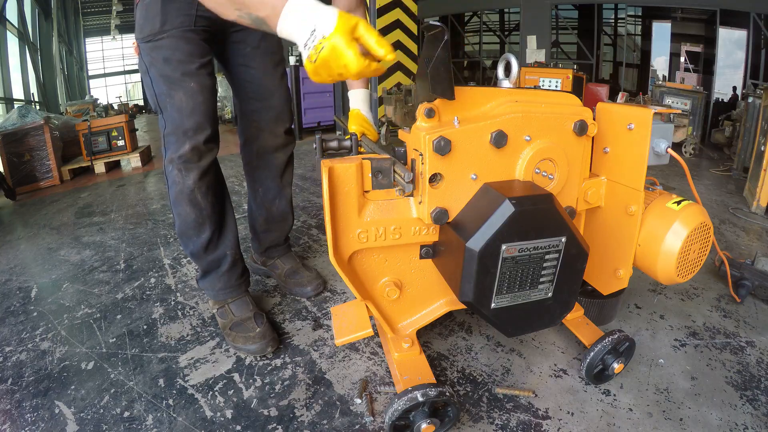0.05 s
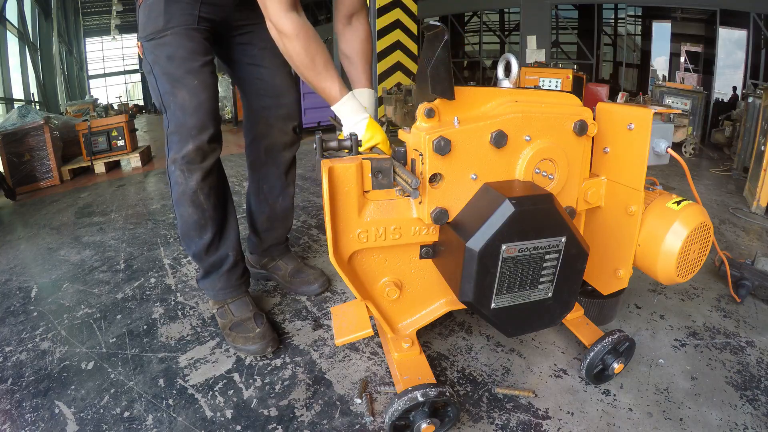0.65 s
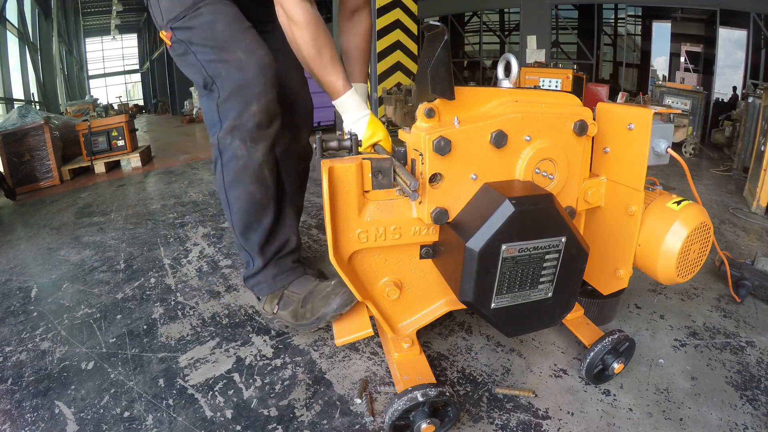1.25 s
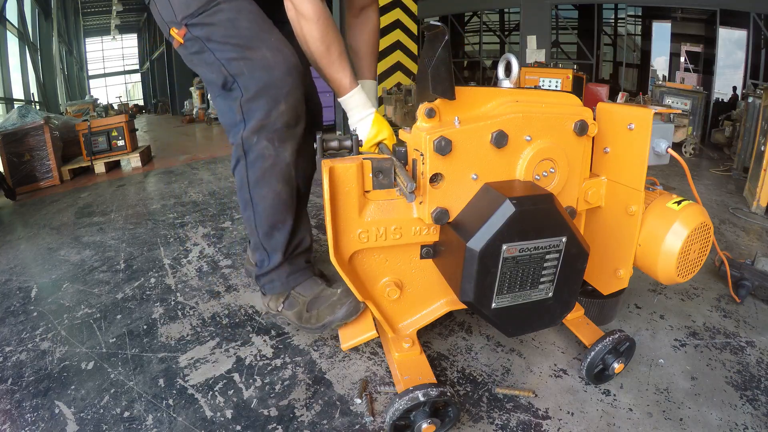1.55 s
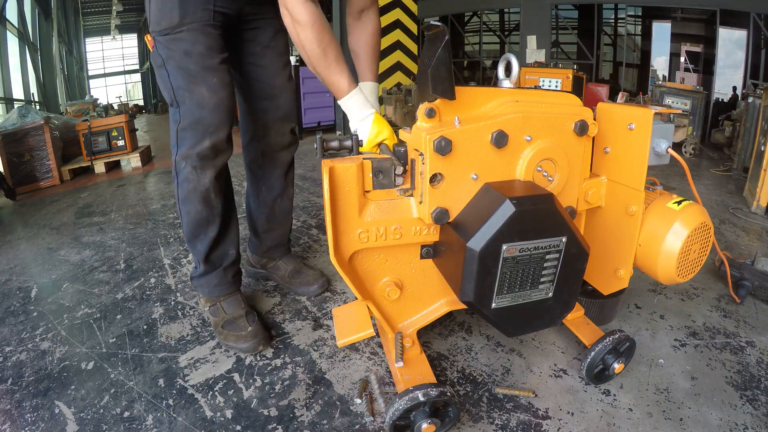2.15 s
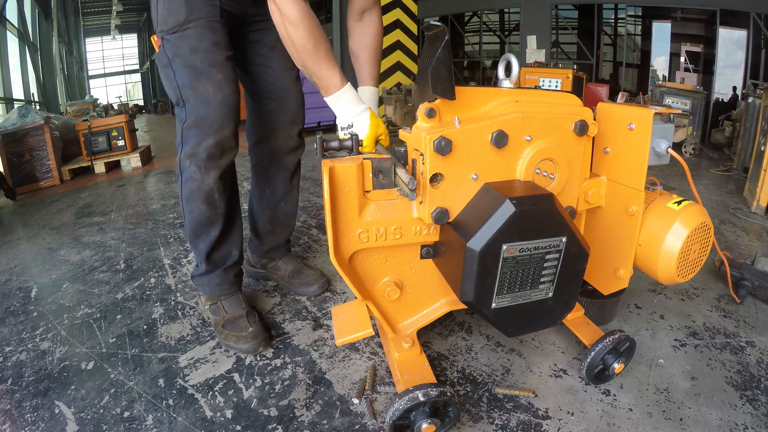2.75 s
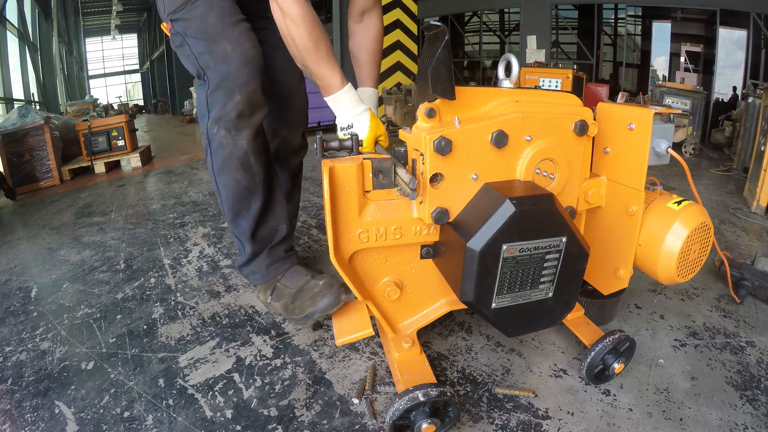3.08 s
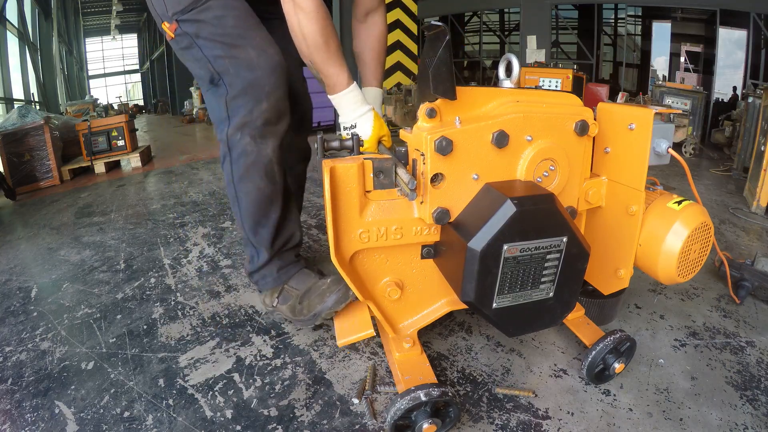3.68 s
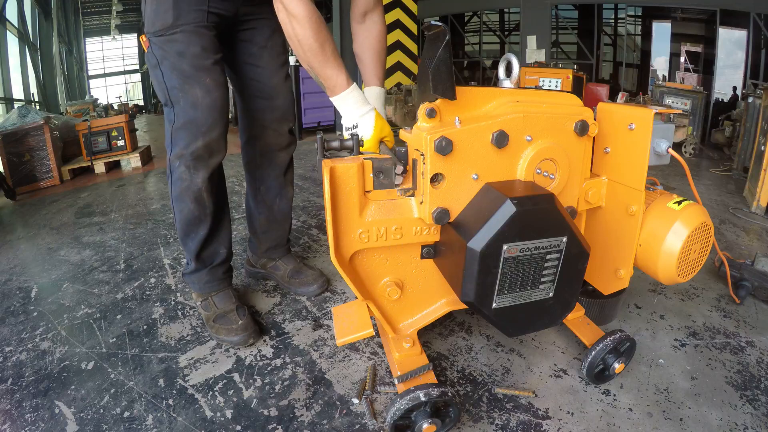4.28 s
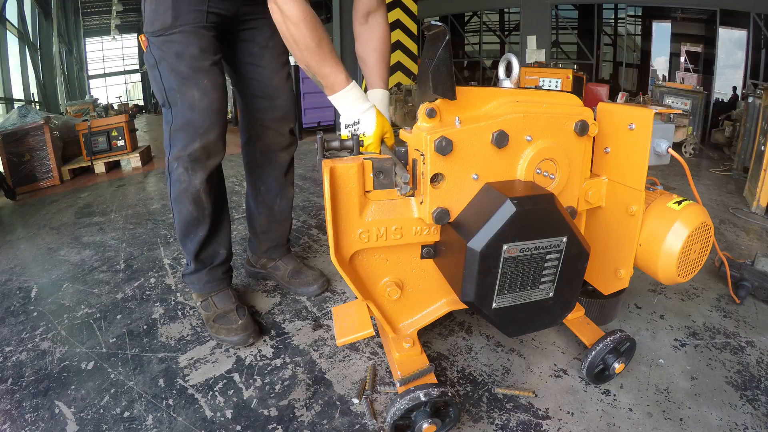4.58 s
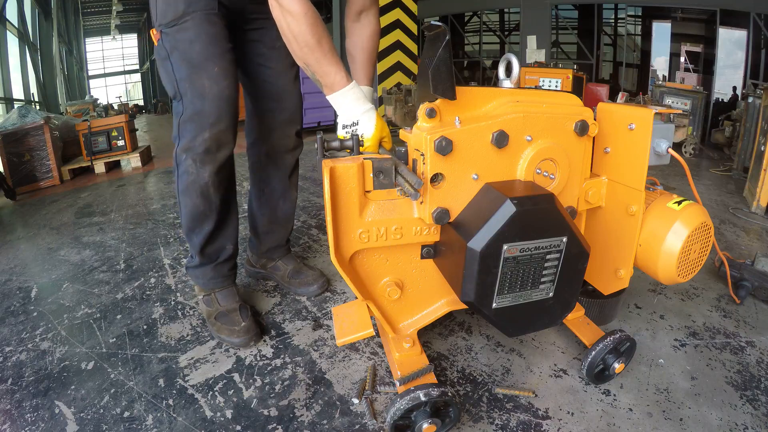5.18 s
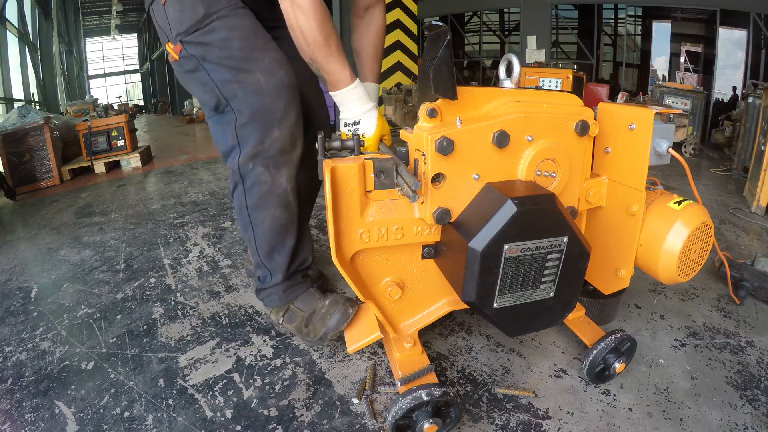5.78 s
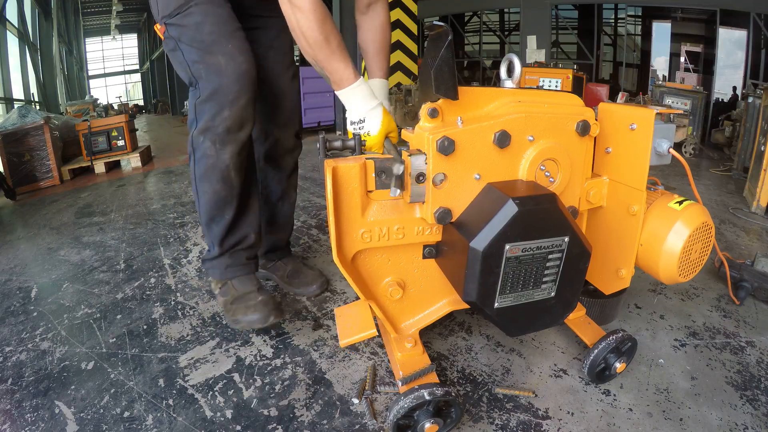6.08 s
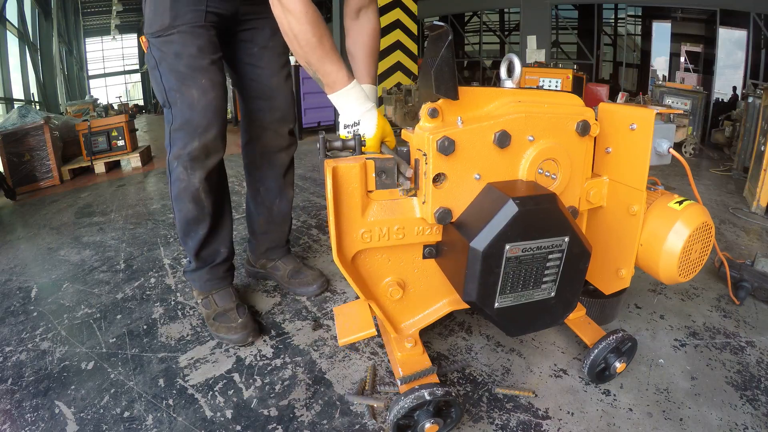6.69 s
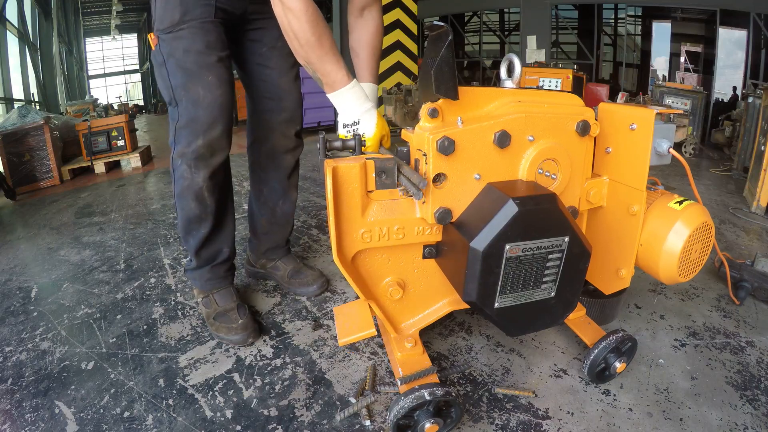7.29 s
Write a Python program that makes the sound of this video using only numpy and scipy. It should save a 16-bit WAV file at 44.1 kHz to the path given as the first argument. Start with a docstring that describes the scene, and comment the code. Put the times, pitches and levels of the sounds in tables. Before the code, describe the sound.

Close to a running steel shear, gear rattle and a buzzing motor drone fill a reverberant workshop. The machine makes three cuts, each a brief scrape followed by a cluster of heavy metal clunks and a crack. Moments later the cut bar ends hit the concrete, bouncing with bright clanks and a faint high ring. The machine noise sinks after every cut, then rises again and is still running at the end.

```python
"""In a concrete workshop hall, a motor-driven rebar shear cuts three times.
Gear teeth rattle in its cast housing over a hum; this steady sound dips at each stroke and swells back.
Stick-slip friction grates, the clutch slams in, and the frame groans and rings as the blade snaps the bars.
The offcuts clatter on the floor and ring thinly in their own modes.
The hall answers with diffuse reverberation and a low standing wave."""
import sys
import numpy as np
from scipy import signal
from scipy.fft import rfft, irfft, next_fast_len
from scipy.io import wavfile
from scipy.ndimage import uniform_filter1d, minimum_filter1d

SR = 44100
rng = np.random.default_rng(int(sys.argv[2]) if len(sys.argv) > 2 else 0)


def store_pcm(level_fs):
    """Save levels as 16-bit WAV."""
    pcm = np.round(np.clip(level_fs, -1, 1) * 32767).astype(np.int16)
    wavfile.write(sys.argv[1], SR, np.atleast_2d(pcm).T)


N = 332514
TIME = np.arange(N) / SR

# Levels in all tables are relative; a spectrum gives only the shape of a spectral density.
# blade strokes: (clutch time [s], bite time [s], return time [s], clutch rasp [dB], bar crunch [dB],
# return level [dB], dip of the steady sound [dB], hall boom [dB])
STROKES = [(1.484, 1.61, 1.892, -2, 2.5, 0.5, 6.5, -35), (3.578, 3.785, 3.989, 1, -3, -2, 8, -31.5),
           (5.806, 5.98, 6.202, 1, -3, -0.5, 7.8, -25.5)]
# clutch and blade blows; hard ones crack more and thud less:
# (time [s], strength [dB], hardness [dB], clink of the bars [dB])
BLOWS = [(1.5879, -12, 6, -18), (1.6283, -28, 5, -24), (1.659, -26.5, 8, -33), (1.7089, -18.5, -4.5, -19),
         (1.833, -22, -1, -17), (1.8765, -14, -6, -31), (1.892, -19.5, -8, -46), (3.7183, -20, 8.5, -15),
         (3.7381, -18.5, -5, -31), (3.761, -22.5, 9.5, -23.5), (3.8041, -16.5, 2.5, -16),
         (3.935, -20, -7, -33), (3.9771, -16.5, -4.5, -30), (3.9847, -15.5, -4, -29),
         (4.1582, -18.5, 0, -20), (5.802, -19.5, -1, -18.5), (5.9203, -13.5, 7.5, -20.5),
         (6.024, -17.5, 2.5, -17), (6.147, -23.5, 1, -26), (6.187, -21, 1, -37), (6.2, -17, -4, -34)]
# fractures of the steel: (time [s], level [dB])
FRACTURES = [(1.5868, -17), (3.719, -40), (3.975, -23), (5.921, -31)]
# offcut landings; heavy ones thud more and clank less:
# (time [s], strength [dB], weight [dB], hardness [dB])
LANDINGS = [(2.183, -27, -6, -5), (2.1945, -17.5, -10.5, 0.5), (2.2882, -17.5, -0.5, -3.5),
            (2.3064, -18.5, 2, 7.5), (2.316, -26, 6.5, 1), (2.605, -38.5, 15, 5), (4.2775, -19.5, -10, 4.5),
            (4.3879, -19, -0.5, 1), (4.4048, -20, 0, 6), (4.413, -25, 3, 0), (4.7859, -35, 1, 7.5),
            (6.4699, -23.5, -4, -3), (6.4776, -21, -13, 2), (6.5302, -22.5, -19.5, 0),
            (6.6009, -16.5, -2, 3.5), (6.6192, -23.5, 2.5, 7), (6.626, -24.5, 4.5, 5.5)]
# low, middle and high spectra of a steel impact: (frequency [Hz], level [dB])
THUD = [(50, -44), (110, -1), (170, -5), (250, 2.5), (350, -7.5), (550, -7.5), (900, -13), (2000, -56.5)]
CLANG = [(400, -2), (900, -2), (1400, 3.5), (2200, 1), (2800, -5.5), (3700, -10), (4500, -8), (6000, -47)]
CRACK = [(2500, -15.5), (4500, -7), (5500, 1.5), (6500, 1), (7200, -8), (8000, -17.5), (9100, -22.5),
         (10000, -27), (16000, -66)]
# spectrum of a bar chattering against the machine: (frequency [Hz], level [dB])
BAR_CLINK = [(2000, -30), (2850, -8), (3150, -1.5), (3400, -4), (3620, -3.5), (3750, 3.5), (3900, -5),
             (4200, -11), (5200, -32), (9000, -71)]


def blows(thud_db=-12.5):
    """Impact and fracture: as clutch and blade slam, the frame thuds, the housing clangs, steel parts."""
    # spectrum of parting steel: (frequency [Hz], level [dB])
    fracture_spectrum = [(6000, -14), (7600, 13), (9100, 2), (9700, -12), (15000, -24)]
    s, db, hardness, _ = np.transpose(BLOWS)
    thud = impacts(s, db - hardness + thud_db, THUD, t60=0.12, snap=0.16, snap_t60=0.011, resonance=0.4)
    clang = impacts(s, db, CLANG, t60=0.11, snap=0.19, snap_t60=0.0099, resonance=0.86)
    crack = impacts(s, db + hardness, CRACK, t60=0.055, snap=0.29, snap_t60=0.0063)
    parting = impacts(*np.transpose(FRACTURES), fracture_spectrum, t60=0.061, snap=0.51, snap_t60=0.0054)
    return thud + clang + crack + parting


def fracture_ticks(level_db=-27, t60=0.0073):
    """Sudden stress release: a parting bar gives a very brief broadband tick."""
    return undb(level_db) * sum(fade(TIME - s, t60) for s, _ in FRACTURES) * contacts(spread_db=5)


def grating():
    """Stick-slip friction: steel slides on steel in each stroke; swells of contacts shake the housing."""
    # Gaussian swells: (lead before the event [s], standard deviation [s], thud [dB], clang [dB], hiss [dB])
    clutch_rasp = (0, 0.01, -25, -17.5, -25.5)
    bars_bending = (-0.05, 0.1061, -30, -31, -57)
    rasp_before_bite = (0.14, 0.0361, -30, -27, -37)
    tick_after_return = (-0.12, 0.0052, -28, -25.5, -40)
    blade_seating = (0, 0.0275, -21, -23, -36)
    swells = []
    for clutch, bite, back, rasp_db, crunch_db, return_db, *_ in STROKES:
        swells += [(clutch, rasp_db, *clutch_rasp),
                   (bite, crunch_db, *bars_bending), (bite, crunch_db, *rasp_before_bite),
                   (back, return_db, *tick_after_return), (back, return_db, *blade_seating)]
    out = 0
    for band, spectrum in enumerate((THUD, CLANG, CRACK)):
        force = sum(undb(db + band_db[band]) * np.exp(-0.5 * ((TIME - s + lead) / width) ** 2)
                    for s, db, lead, width, *band_db in swells)
        out += body(force * contacts(spread_db=4), spectrum, resonance=0.97)
    return out


def frame_groan(edge_s=0.015, clear_hz=135, rough_hz=290):
    """Vibration under load: the frame's creak sinks in each cut, turning from noise towards a tone."""
    # one glide per cut: (time [s], pitch [Hz], level [dB])
    glides = [
        [(1.475, 598.5, -35), (1.535, 512, -24), (1.56, 331.3, -22), (1.585, 266.5, -26), (1.635, 239.4, -27),
         (1.66, 157.3, -27), (1.72, 149, -21.5), (1.765, 149, -39)],
        [(3.712, 641, -25), (3.748, 499, -38), (3.768, 258, -22.5), (3.795, 237, -23), (3.815, 154, -19.5),
         (3.85, 149, -39)],
        [(5.895, 345.8, -31), (5.925, 273.7, -25), (5.975, 236, -20), (6.0, 169.5, -31), (6.03, 153, -19),
         (6.07, 148, -39)],
    ]
    out = 0
    for glide in glides:
        s, hz, db = np.transpose(glide)
        pitch = np.interp(TIME, s, hz)
        gain = uniform_filter1d(np.interp(TIME, s, undb(db), left=0, right=0), int(edge_s * SR))
        roughness = (pitch - clear_hz) / (rough_hz - clear_hz)
        out += gain * hoarse(pitch, width_hz=230, noise_share=roughness)
    return out


def thumps(level_db=-2, rise_s=0.0069):
    """Damped oscillation: short, low thumps of a few swings at blade blows and heavy offcut landings."""
    # (time [s], pitch [Hz], level [dB])
    events = [(1.585, 253, -15), (1.62, 245, -13), (1.708, 200, -19), (2.308, 230, -14), (3.598, 195, -18),
              (3.765, 253, -16), (3.804, 176, -17), (3.986, 216, -13), (5.937, 231, -15.5),
              (6.023, 176, -19), (6.61, 245, -19)]
    out, age = np.zeros(2 * N), TIME[:SR // 4]
    envelope = age / rise_s * np.exp(1 - age / rise_s)
    for s, hz, db in events:
        start = int(s * SR)
        out[start:start + len(age)] += undb(db + level_db) * envelope * np.sin(2 * np.pi * hz * age)
    return out[:N]


def machine_ring(clink_db=-1, frame_db=-15):
    """Free vibration: after a blow the held bars chatter and the cast frame rings on."""
    # (frequency [Hz], level [dB], T60 [s])
    frame_modes = [(206, -2, 0.5), (247, -4, 0.6), (374, -7.5, 0.91), (430, -7.5, 1.0), (517, -5.5, 0.78),
                   (635, -11.5, 0.69), (738, -8, 0.41)]
    s, db, hardness, clink = np.transpose(BLOWS)
    bars = impacts(s, clink + clink_db, BAR_CLINK, t60=0.13, snap=0.1, snap_t60=0.01)
    return bars + modal_ring(s, db - hardness + frame_db, frame_modes, detune=0.0026)


def landings(thud_db=-3, clang_db=-1, crack_db=-1):
    """Impact noise: offcuts knock and chatter on the concrete and the machine's foot."""
    # spectrum of steel striking the floor: (frequency [Hz], level [dB])
    floor_clang = [(600, -26.5), (1200, 3), (1700, 0.5), (2300, -1.5), (2800, 2.5), (3700, 3), (4500, -4),
                   (6000, -39.5)]
    s, db, weight, hardness = np.transpose(LANDINGS)
    thud = impacts(s, db + weight + thud_db, THUD, t60=0.081, snap=0.1, snap_t60=0.018, resonance=0.18)
    clang = impacts(s, db + clang_db, floor_clang, t60=0.12, snap=0.2, snap_t60=0.0079, resonance=0.33)
    crack = impacts(s, db + hardness + crack_db, CRACK, t60=0.083, snap=0.21, snap_t60=0.0063)
    return thud + clang + crack


def offcut_clank(clank_db=-10, damping=0.66, foot_db=-12.5):
    """Impact excitation: offcuts tick with their tips, clank as they bend and ring the machine's foot."""
    # first touches of a tip on the machine: (time [s], level [dB])
    tip_ticks = [(2.1817, -23), (6.4696, -14)]
    # spectrum of an offcut bending against the floor: (frequency [Hz], level [dB])
    bending = [(600, -48), (1100, -27), (1530, -6.5), (1700, 2), (1850, 0), (2020, -11), (2200, -2),
               (2330, -20), (2450, 0), (2800, -17), (5000, -42), (9000, -75)]
    # (frequency [Hz], level [dB], T60 [s])
    foot_modes = [(152, -8, 0.8), (208.4, -4, 0.4), (247.4, -2.5, 0.38), (372, -11, 0.62), (522, 3, 1.0),
                  (592, -8, 1), (635, -8, 1)]
    s, db, weight, _ = np.transpose(LANDINGS)
    ticks = impacts(*np.transpose(tip_ticks), BAR_CLINK, t60=0.04, snap=0.3, snap_t60=0.008)
    clank = impacts(s, db - damping * weight + clank_db, bending, t60=0.21, snap=0.1, snap_t60=0.01)
    return ticks + clank + modal_ring(s, db + weight + foot_db, foot_modes, detune=0.0047)


def rebounds(level_db=-7, damping=0.49, gap_s=0.009, loss_db=1.4, count=9):
    """Inelastic collisions: an offcut rocks end to end, and weakening knocks ring its bending modes."""
    # (frequency [Hz], level [dB], T60 [s])
    bending_modes = [(1526, 0, 0.07), (1715, 2, 0.09), (1870, 1, 0.075), (2186, 0, 0.07), (2423, 0, 0.06)]
    out, age = 0, TIME[:SR // 3]
    s, db, weight, _ = np.transpose(LANDINGS)
    gaps = gap_s * rng.uniform(0.5, 1.5, (len(s), count))
    starts = ((s[:, None] + np.cumsum(gaps, axis=1) - gaps[:, :1]) * SR).astype(int)
    first_db = db - damping * weight + level_db
    strength = undb(first_db[:, None] - loss_db * np.arange(count))
    for hz, mode_db, t60 in bending_modes:
        knocks = np.zeros(N)
        np.add.at(knocks, starts, strength * rng.uniform(-0.94, 1, starts.shape))
        response = undb(mode_db) * np.sin(2 * np.pi * hz * age) * fade(age, t60)
        out += signal.fftconvolve(knocks, response)[:N]
    return out


def offcut_ring(level_db=-1, shimmer_db=2.5, shimmer_hz=36):
    """High natural modes: a tumbling offcut sings thinly, each mode shimmering separately as it turns."""
    # (time [s], swell [s], hold [s], level [dB], T60 [s], modes as (frequency [Hz], level [dB]))
    tumbles = [(2.19, 0.03, 0.05, -42, 0.85, [(10560, 0), (11080, -2), (12910, -9), (13380, -13)]),
               (2.595, 0.02, 0.01, -43, 0.45, [(10440, 0), (10950, -8), (13040, -15), (13560, -13)]),
               (4.275, 0.05, 0.06, -37, 0.3, [(5820, -3), (10410, 0), (10920, -13), (13590, -13)]),
               (4.42, 0.21, 0.03, -38, 0.7, [(10286, 0), (10760, -7), (13240, -15), (13720, -14)]),
               (6.472, 0.011, 0.035, -33.5, 0.2, [(5730, -8), (9028, 0), (9119, -7), (14950, -24)]),
               (6.768, 0.02, 0.09, -33, 0.45, [(8689, -1), (9028, -9), (9437, 0), (14550, -25)])]
    out = 0
    for s, swell, hold, db, t60, modes in tumbles:
        age = TIME - s
        envelope = np.clip(age / swell, 0, 1) * fade(np.maximum(age - swell - hold, 0), t60)
        for hz, mode_db in modes:
            gain = undb(level_db + db + mode_db + shimmer_db * wobble(shimmer_hz))
            out += envelope * gain * hoarse(hz, width_hz=150, noise_share=0.3)
    return out


def drive(level_db=0.88, shaft_hz=30.3, depth=0.11):
    """Amplitude modulation: the gear mesh tightens once a turn; all parts dip in level at each stroke."""
    gain = undb(level_db - dip_db())
    mesh = 1 + depth * np.cos(2 * np.pi * shaft_hz * TIME)
    return (gain * gear_rattle(mesh)
            + gain ** 1.33 * guard_buzz(mesh)
            + gain ** 0.86 * motor_hum()
            + gain ** 1.03 * fan()
            + gain ** 1.33 * belt())


def dip_db(fall_s=0.79, rise_s=0.78, early_s=0.027, last_cycle_end_s=7.836):
    """Gain envelope: the steady sound dips after each loud stroke and swells back, like gain control."""
    cycle_ends = [clutch for clutch, *_ in STROKES[1:]] + [last_cycle_end_s]
    recovered = np.array(cycle_ends) - early_s
    return sum(np.interp(TIME, [clutch, clutch + fall_s, full - rise_s, full], [0, db, db, 0])
               for (clutch, *_, db, _), full in zip(STROKES, recovered))


def gear_rattle(mesh, level_db=-26, waver_db=0.5):
    """Structure-borne noise: colliding gear teeth excite the resonances of the housing."""
    # (frequency [Hz], level [dB])
    spectrum = [(35, -52), (60, -11), (92, -9.5), (253, -6), (317, -6), (509, -5.5), (557, -14.5),
                (816, -12), (1020, -11.5), (1090, -13.5), (1790, -10.5), (2350, -16), (3080, -19),
                (6050, -33), (13000, -64.5)]
    gain = undb(level_db + waver_db * wobble(16))
    return gain * body(mesh * contacts(spread_db=3), spectrum, resonance=0.99)


def guard_buzz(mesh, level_db=-31.5, swell_db=1.8):
    """Forced vibration: the gears shake loose guard sheets, which buzz in three bands."""
    # (frequency [Hz], level [dB])
    spectrum = [(900, -27.5), (1100, -5.5), (1220, -9.5), (1360, -10), (1470, -9.5), (1600, -5.5),
                (1810, 1), (2100, -16.5), (2800, -18), (3070, -11), (3500, -19), (8000, -64)]
    force = mesh * contacts(spread_db=4) * undb(swell_db * wobble(45))
    return undb(level_db) * body(force, spectrum, resonance=0.94)


def motor_hum(level_db=-1):
    """Periodic forcing: motor and gears give wavering tones, the low ones least steady in level."""
    # (frequency [Hz], level [dB])
    partials = [(152, -38.5), (207, -40), (393, -42), (517, -43), (797, -46), (1093, -44.5), (1195, -43.5),
                (1364, -51), (1803, -43.5), (1927, -42)]
    out = 0
    for hz, db in partials:
        waver_db = 3.2 if hz < 300 else 2.5
        out += undb(db + level_db + waver_db * wobble(9)) * tone(hz, wander=0.909)
    return out


def belt(turn_hz=6.95, first_swell_s=0.018, throb_db=2.8, waver_db=2.5):
    """Amplitude modulation: the belt drive's unsteady drone throbs once a turn."""
    # (frequency [Hz], level [dB])
    partials = [(247.5, -35), (270, -38)]
    throb = throb_db * np.cos(2 * np.pi * turn_hz * (TIME - first_swell_s))
    return sum(undb(db + throb + waver_db * wobble(9.9)) * tone(hz, wander=1.76) for hz, db in partials)


def fan(level_db=-37):
    """Flow noise: the motor fan gives a broadband rush."""
    # (frequency [Hz], level [dB])
    spectrum = [(100, -8), (600, 0), (2000, -15), (4500, -14), (6300, -10), (8000, -27.5), (10000, -40.5),
                (14000, -48)]
    return undb(level_db) * body(rng.standard_normal(N), spectrum)


def rumble(level_db=1.3):
    """Random low-frequency vibration: the frame shakes on its wheels."""
    # (time [s], level [dB])
    envelope = [(0, -32.5), (1.7, -47), (2.8, -39.5), (3.7, -31.5), (4.1, -50), (4.45, -38.5), (4.85, -40),
                (5.75, -31), (6.8, -40.5), (7.54, -37)]
    # (frequency [Hz], level [dB])
    spectrum = [(15, 5), (30, 21), (45, 14), (63, 16.5), (90, 10.5), (200, 4.5), (600, -62)]
    gain = undb(np.interp(TIME, *np.transpose(envelope)) + level_db)
    return gain * body(rng.standard_normal(N), spectrum)


def hall(x, build_s=0.059, lowest_hz=50, octaves=9):
    """Diffuse reverberation: the tail builds up as echoes return, and each octave has its own decay."""
    # (frequency [Hz], T60 [s])
    decay_times = [(100, 0.5), (500, 2.15), (2000, 2.4), (6000, 1.06), (12000, 0.68)]
    # (frequency [Hz], level [dB])
    tail_levels = [(100, -18), (500, 1.5), (1500, -10.5), (3500, -4.5), (6300, -5.5), (12000, -3.5)]
    age, tail = TIME[:2 * SR], 0
    noise = rfft(rng.standard_normal(len(age)))
    bin_hz = np.maximum(np.arange(len(noise)) / 2, 1)
    octave = np.clip(np.log2(bin_hz / lowest_hz), 0, octaves - 1)
    for k in range(octaves):
        hz = lowest_hz * 2 ** k
        envelope = (1 - np.exp(-age / build_s)) * np.exp(-np.log(1000) * age / across(decay_times, hz))
        band = irfft(noise * np.maximum(1 - abs(octave - k), 0))
        tail += band * envelope / np.linalg.norm(envelope) * undb(across(tail_levels, hz))
    return signal.fftconvolve(x, tail)[:N]


def hall_hiss(level_db=-20, t60=1.72, build_s=0.039):
    """Incoherent addition: bright hisses hang in the hall after hard landings, and their powers sum."""
    power = sum((undb(db + hardness) * fade(TIME - s, t60) * np.clip((TIME - s) / build_s, 0, 1)) ** 2
                for s, db, _, hardness in LANDINGS)
    # (frequency [Hz], level [dB])
    spectrum = [(1500, -55), (4500, -30), (5200, -22), (5700, -1), (6150, 0), (6600, -8), (7000, -7),
                (7800, -14), (9000, -33), (12000, -65)]
    return undb(level_db) * np.sqrt(power) * body(rng.standard_normal(N), spectrum)


def hall_boom(hz=62.9, wander_hz=1.656, t60=1.46, swell_s=0.082, return_db=-3, landing_db=-17):
    """Standing wave: a low room mode swells after each bite, return and heavy landing and dies slowly."""
    kicks = [(s, db + weight + landing_db) for s, db, weight, _ in LANDINGS if weight > 0]
    for _, bite, back, *_, db in STROKES:
        kicks += [(bite, db), (back, db + return_db)]
    decays = sum(undb(db) * fade(TIME - s, t60) for s, db in kicks)
    envelope = uniform_filter1d(decays, int(swell_s * SR))
    return np.sqrt(2) * envelope * np.sin(phase_of(hz + wander_hz * wobble(6)))


def stereo_pair(mid, scatter_s=0.03):
    """Interference: nearby reflections set two close listening points apart in level and phase."""
    # side against mid: (frequency [Hz], in-phase part [ratio], quadrature part [ratio], diffuse part [dB])
    side_response = [(65, -0.12, -0.17, -11), (111, 0.0061, -0.19, -8), (158, 1.55, 0.69, 2.5),
                     (203, 0.65, -0.19, 1), (257, -0.16, 0.033, -17), (400, -0.11, -0.062, -10.5),
                     (596, -0.15, -0.3, -8), (790, -0.78, 0.36, -8.5), (1090, -0.51, 0.52, -6.5),
                     (1780, -0.19, 0.6, -11), (2400, -0.25, 0.24, -7.5), (4180, -0.093, -0.27, -13.5),
                     (5660, -0.16, -0.48, -6.5), (7470, 0.49, 0.69, -3), (9200, -0.77, 1, 0),
                     (10400, -0.36, 0.65, 0), (11900, -0.13, 0.72, -4)]
    size, age = next_fast_len(2 * N), TIME[:SR // 4]
    reflections = rng.standard_normal(len(age)) * np.exp(-age / scatter_s)
    scatter = rfft(reflections / np.linalg.norm(reflections), size)
    hz, *columns = np.transpose(side_response)
    in_phase, quadrature, diffuse_db = (np.interp(np.log(bins(size)), np.log(hz), c) for c in columns)
    transfer = in_phase + 1j * quadrature + undb(diffuse_db) * scatter
    side = irfft(rfft(mid, size) * transfer, size)[:N]
    return np.array([mid + side, mid - side])


def impacts(times, levels, spectrum, t60, snap, snap_t60, resonance=0):
    """Source and filter: each impact is a sharp snap and dying chatter, shaped by the struck body."""
    force, age = np.zeros(2 * N), TIME[:SR // 2]
    envelope = fade(age, t60) + snap * fade(age, snap_t60)
    for s, db in zip(times, levels):
        start = int(s * SR)
        force[start:start + len(age)] += undb(db) * envelope
    return body(force[:N] * contacts(spread_db=3.5), spectrum, resonance)


def modal_ring(times, levels, modes, detune, scatter_db=2, attack_s=0.001):
    """Modal superposition: each knock rings the modes in a new mix; a changing grip detunes them."""
    out, age = np.zeros(2 * N), TIME[:SR]
    attack = np.minimum(age / attack_s, 1)
    for s, level in zip(times, levels):
        start = int(s * SR)
        for hz, db, t60 in modes:
            gain = undb(level + db + scatter_db * rng.standard_normal())
            cycles = hz * (1 + detune * rng.standard_normal()) * age + rng.random()
            out[start:start + SR] += gain * attack * np.sin(2 * np.pi * cycles) * fade(age, t60)
    return out[:N]


def body(x, spectrum, resonance=0, size=16384):
    """Minimum-phase filter of unit energy: a broad spectrum plus a share of the housing's resonances."""
    # resonances of the housing and its guards: (frequency [Hz], width [Hz], lift [dB])
    housing_modes = [(151.5, 11.6, 9), (208.4, 5.9, 10), (269, 15, 4.5), (434, 15.5, 6), (517, 7.1, 8),
                     (637, 48, 7), (737, 7.5, 12), (1112.5, 25, 11.5), (1322, 22, 8.5), (1586, 19, 8),
                     (1805, 41, 7), (3070, 90, 5.5), (3620, 150, 5.5)]
    hz = bins(size)
    peaks_db = sum(lift / (1 + (2 * (hz - f) / width) ** 2) for f, width, lift in housing_modes)
    cepstrum = irfft(np.log(undb(across(spectrum, hz) + resonance * peaks_db)))
    cepstrum[1:size // 2] *= 2  # folding the cepstrum makes the response causal
    cepstrum[size // 2 + 1:] = 0
    response = irfft(np.exp(rfft(cepstrum)))
    return signal.fftconvolve(x, response / np.linalg.norm(response))[:N]


def contacts(spread_db, grain=16):
    """Contact noise of rms 1: dense, tiny metal collisions of log-normal size."""
    grain_db = spread_db * np.repeat(rng.standard_normal(N // grain + 1), grain)[:N]
    force = rng.standard_normal(N) * undb(grain_db)
    return force / np.std(force)


def tone(hz, wander):
    """Frequency modulation: a sine of rms 1 whose pitch wanders, more so the higher it is."""
    return np.sqrt(2) * np.sin(phase_of(hz + wander * (1 + hz / 600) * wobble(14)))


def hoarse(hz, width_hz, noise_share):
    """Line broadening: a tone of rms 1 with a share of its power spread into a narrow noise band."""
    phase = phase_of(hz)
    noise = wobble(width_hz) * np.cos(phase) + wobble(width_hz) * np.sin(phase)
    share = np.clip(noise_share, 0, 1)
    return np.sqrt(2 * (1 - share)) * np.sin(phase) + np.sqrt(share) * noise


def wobble(rate_hz):
    """Smooth random fluctuation with a standard deviation of 1."""
    step = int(SR / rate_hz)
    curve = uniform_filter1d(np.repeat(rng.standard_normal(N // step + 2), step), step)[:N]
    return curve / np.std(curve)


def fade(age, t60):
    """Exponential decay: jumps to 1 at age 0 and falls 60 dB in t60 seconds."""
    return (age >= 0) * np.exp(-np.log(1000) * np.clip(age / t60, 0, 3))


def phase_of(hz):
    """Phase in radians, the running integral of frequency."""
    return 2 * np.pi * np.cumsum(hz * np.ones(N)) / SR


def across(points, hz):
    """Interpolate (frequency [Hz], value) points on a logarithmic frequency axis."""
    f, value = np.transpose(points)
    return np.interp(np.log(hz), np.log(f), value)


def bins(size):
    """Frequencies of a real Fourier transform, no lower than 1 Hz."""
    return np.maximum(np.arange(size // 2 + 1) * SR / size, 1)


def undb(db):
    """Decibels to amplitude ratio."""
    return 10 ** (np.asarray(db) / 20)


def scene(ring_send_db=-7):
    """Superposition: the direct sound of shear and offcuts adds to the hall's answer to cuts and falls."""
    knocks = grating() + blows() + landings()
    ringing = frame_groan() + thumps() + machine_ring() + offcut_clank() + rebounds()
    reverberant = hall(knocks + undb(ring_send_db) * ringing) + hall_hiss() + hall_boom()
    direct = knocks + ringing + drive() + rumble() + offcut_ring() + fracture_ticks()
    return stereo_pair(direct + reverberant)


def record(dry, window=128, top_hz=15800):
    """Peak limiting: a fast gain dip holds peaks at full scale, then a low-pass filter cuts the top."""
    allowed_gain = 1 / np.maximum(abs(dry).max(axis=0), 1)
    gain = uniform_filter1d(minimum_filter1d(allowed_gain, window), window)
    return signal.sosfilt(signal.ellip(8, 0.2, 70, top_hz, fs=SR, output="sos"), dry * gain)


dry = scene()
out = record(dry)
store_pcm(out)
```